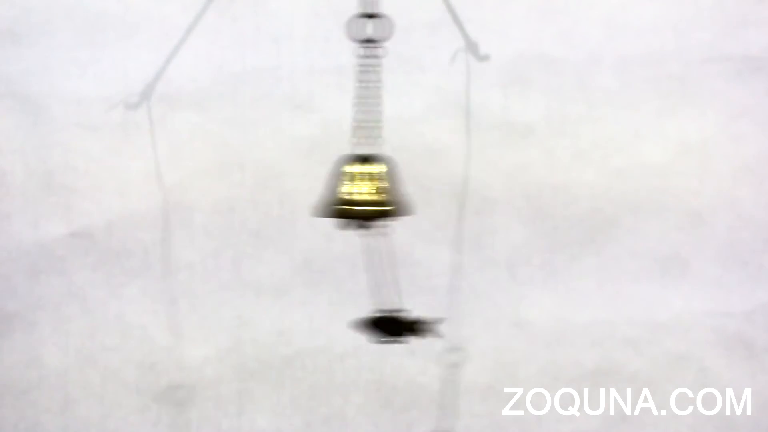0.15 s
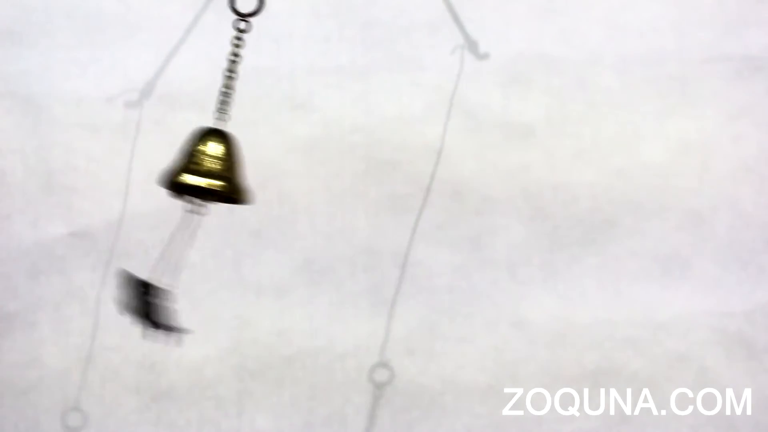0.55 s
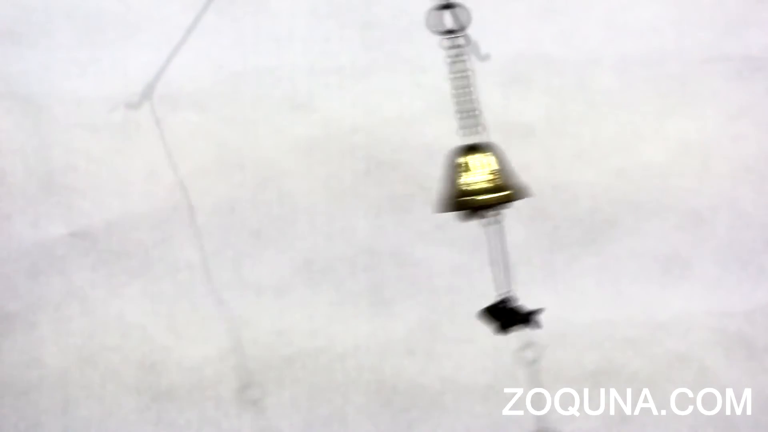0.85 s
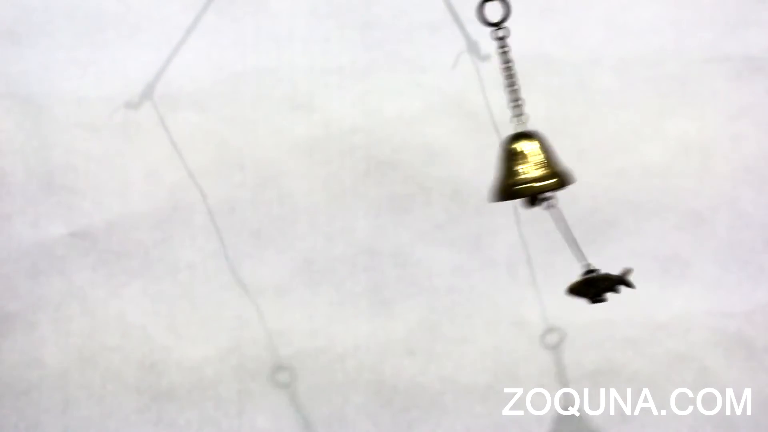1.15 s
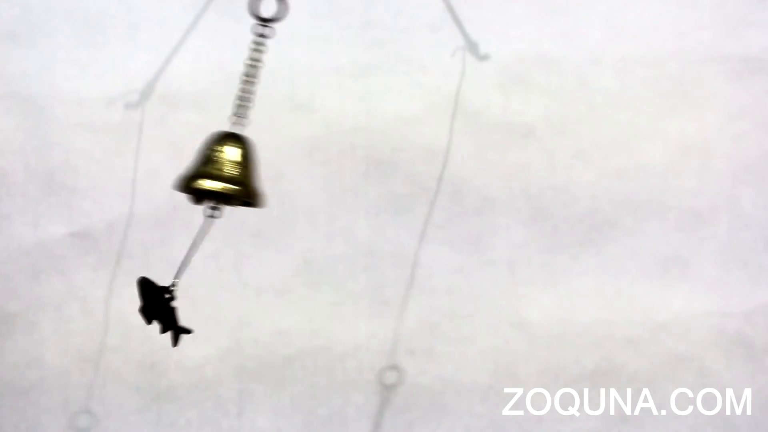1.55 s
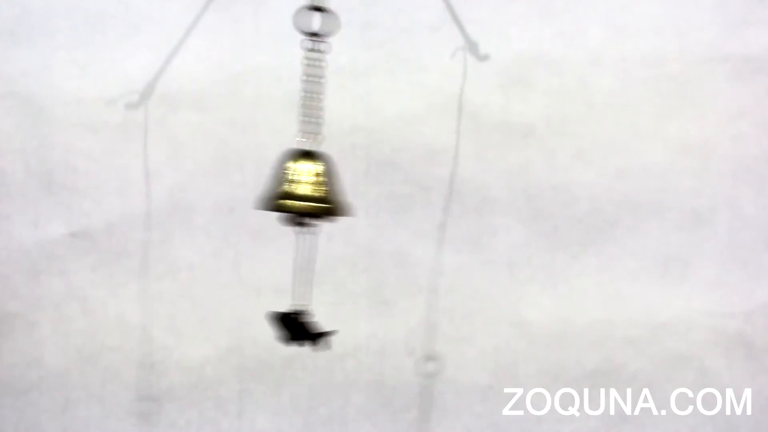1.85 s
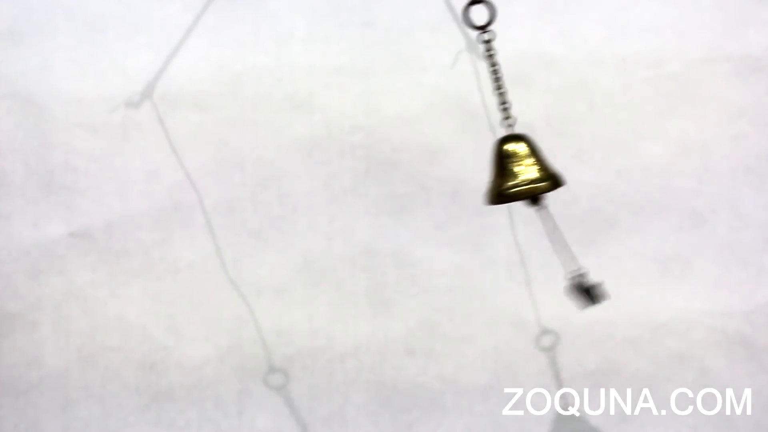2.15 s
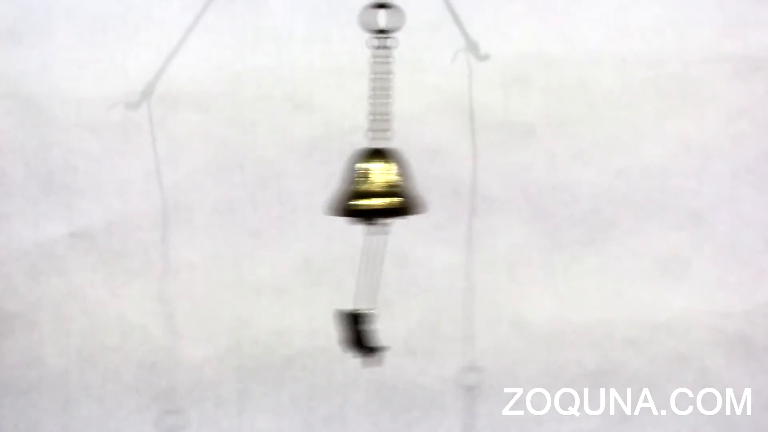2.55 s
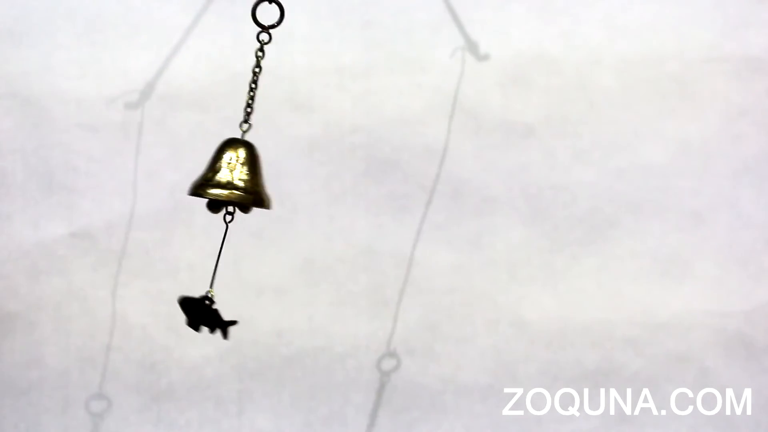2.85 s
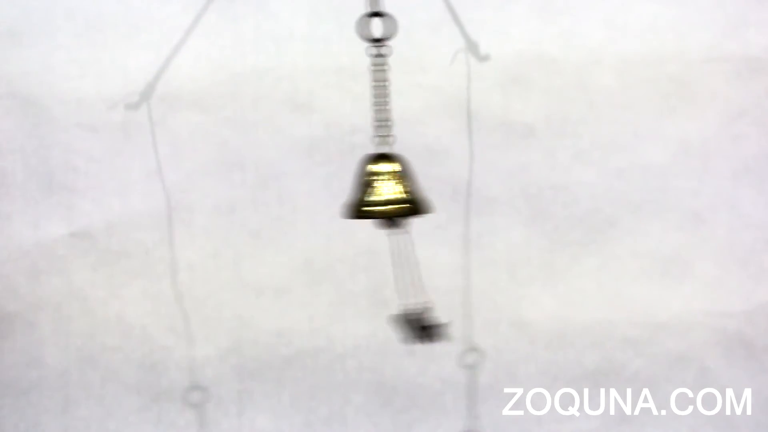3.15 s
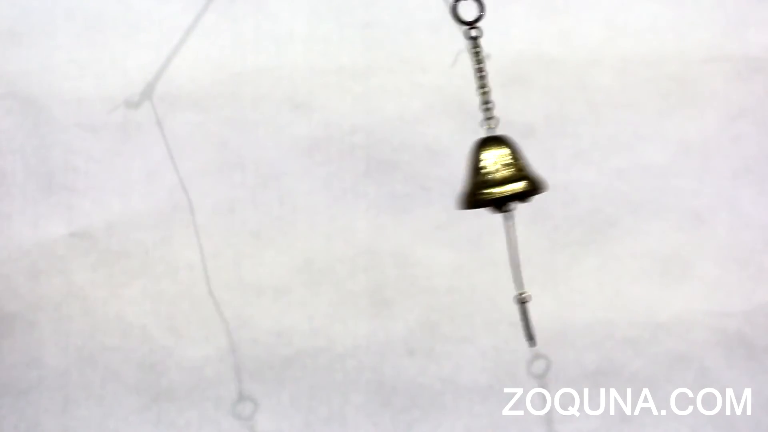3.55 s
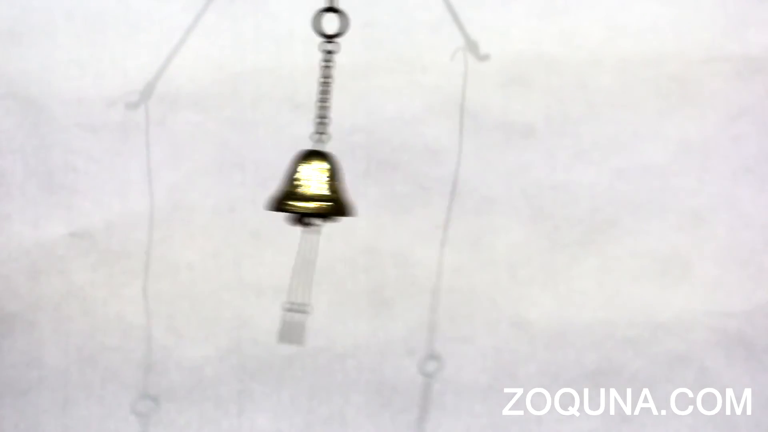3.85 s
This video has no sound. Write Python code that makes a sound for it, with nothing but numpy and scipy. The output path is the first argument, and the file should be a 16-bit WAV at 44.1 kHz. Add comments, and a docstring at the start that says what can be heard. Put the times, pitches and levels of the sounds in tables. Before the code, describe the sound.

Small hanging brass bell swings and tinkles with a clear, fluttering high ring in a quiet room.

```python
"""A small brass wind bell swings on its chain; its clapper strikes five times, hard at first, then lightly.
The bell's main tone and its overtone are close pairs of decaying modes that beat, swelling and fading
as the bell moves; each strike adds a burst of noise and a few short-lived modes.
Behind it: filtered-noise room hiss, a low hum of sines, soft noise scuffs and one faint narrow-band squeak."""
import sys
import numpy as np
from scipy.fft import rfft, irfft, next_fast_len
from scipy.io import wavfile
from scipy.ndimage import map_coordinates

SR = 44100
rng = np.random.default_rng(int(sys.argv[2]) if len(sys.argv) > 2 else 0)


def master_out(mix):
    """Clip the mix to full scale and print it as 16-bit PCM to the path in sys.argv[1]."""
    frames = np.transpose(np.atleast_2d(mix))
    ceiling = np.clip(frames, -1, 1)
    pcm = np.round(ceiling * 32767).astype(np.int16)
    wavfile.write(sys.argv[1], SR, pcm)


N = 176400

# Clapper strikes, mode levels before any swell: (time [s], lower prime mode [dB], upper prime mode [dB],
# lower overtone [dB], upper overtone [dB], click [dB], short-lived modes [dB])
STRIKES = [(-.012, -25.5, -26.5, -44, -52.5, -62, -55), (.7533, -22.5, -33.5, -31, -37, -32, -29),
           (1.2484, -29, -39.5, -54.5, -44.5, -37, -60), (2.272, -57.5, -37, -80, -62, -47.5, -69),
           (3.287, -43.5, -49, -76, -64.5, -51, -69)]


def amp(db):
    """Decibels to gain."""
    return 10 ** (np.asarray(db) / 20)


def unit(x):
    """Scale to rms 1."""
    return x / np.sqrt(np.mean(abs(x) ** 2) + 1e-20)


def clock():
    """Time of every sample [s]."""
    return np.arange(N) / SR


def along(points, hz):
    """Read a curve of (frequency [Hz], value) points on a log frequency axis."""
    f, v = np.transpose(points)
    return np.interp(np.log(hz + 1), np.log(f + 1), v)


def wobble(rate):
    """A smooth random curve with this many knots a second."""
    return map_coordinates(rng.standard_normal(256), [clock() * rate], mode="wrap")


def filtered(x, response):
    """Shape the spectrum of x with a gain that depends on frequency."""
    m = next_fast_len(N + SR // 2)  # spare length keeps the filter from wrapping round
    gain = response(np.fft.rfftfreq(m, 1 / SR))
    return irfft(rfft(x, m) * gain, m)[..., :N]


def noise(spectrum):
    """Stereo noise of rms 1 in the given colour; the mid-side balance sets how alike the ears are."""
    # Likeness of the two ears: (frequency [Hz], left-right correlation [-1 to 1])
    likeness = [(40, 0.78), (90, 0.68), (200, 0.38), (400, -0.22), (700, -0.19), (1400, -0.4), (3000, 0.09),
                (12000, -0.28)]

    def mid_side_gain(hz):
        turn = np.arccos(np.clip(along(likeness, hz), -1, 1)) / 2
        return amp(along(spectrum, hz)) * [np.cos(turn), np.sin(turn)]

    mid, side = filtered(rng.standard_normal((2, N)), mid_side_gain)
    return unit(np.array([mid + side, mid - side]))


def room(waver_rad=0.58):
    """Steady hiss of coloured noise, and a low hum of sines whose phases waver."""
    # Colour of the hiss: (frequency [Hz], relative level [dB])
    hiss_colour = [(20, -16), (32, -15.5), (42, 4), (70, -2.5), (100, 0), (200, -1.5), (350, -3.5),
                   (550, -7.5), (1300, -10.5), (3200, -13), (5500, -20), (9000, -21), (12000, -25.5),
                   (15500, -28)]
    # Hum tones: (frequency [Hz], level [dB])
    hum_tones = [(45, -67.5), (68, -63.5), (279.9, -66)]
    hiss_db = -53.5
    hum = np.zeros(N)
    for hz, db in hum_tones:
        phase = 2 * np.pi * hz * clock() + waver_rad * wobble(5.3)
        hum += amp(db) * np.sqrt(2) * np.sin(phase)
    return amp(hiss_db) * noise(hiss_colour) + hum


def scuffs(rough_db=0.5):
    """Soft rubbing noises that swell and die away, some with a dull thud of lower noise."""
    # Scuffs: (peak time [s], rise [s], 20 dB fall [s], scrape level [dB], thud level [dB])
    strokes = [(.22, .05, 0.16, -61.5, -74.5), (1.709, 0.0072, .06, -53, -90),
               (1.96, .045, 0.29, -44, -59.5), (2.07, 0.044, 0.14, -50, -69),
               (2.587, .022, 0.12, -41, -43.5), (2.7, .04, 0.24, -61, -60), (2.93, .055, 0.35, -52.5, -52),
               (3.713, .012, 0.078, -46, -85)]
    # Colours of the scrape and of the thud: (frequency [Hz], relative level [dB])
    scrape_colour = [(150, -9), (400, -5.5), (700, -6), (1400, -2.5), (2400, -2), (3400, 4.5), (4100, -1.5),
                     (5000, -15), (9000, -20.5), (15000, -37)]
    thud_colour = [(60, -20.5), (130, -3.5), (280, -3), (350, -5), (385, -6.5), (415, 12.5), (450, -5),
                   (520, -19), (900, -31), (3000, -70.5)]
    t = clock()
    scrape_power, thud_power = np.zeros(N), np.zeros(N)
    for s, rise, fall, scrape_db, thud_db in strokes:
        swelling = np.exp(-((t - s) / rise) ** 2)
        dying = amp(-20 * abs(t - s) / fall)
        shape = np.where(t < s, swelling, dying)
        scrape_power += (amp(scrape_db) * shape) ** 2
        thud_power += (amp(thud_db) * shape) ** 2
    scrape = np.sqrt(scrape_power) * amp(rough_db * wobble(60)) * noise(scrape_colour)
    return scrape + np.sqrt(thud_power) * noise(thud_colour)


def squeak():
    """A thin, fluttering squeak of narrow-band noise leads into the loudest scuff."""
    start_s, end_s, edge_s = 2.284, 2.62, 0.025
    centre_hz, width_hz = 3240, 32
    level_db, flutter_db = -51.5, 3.5
    t = clock()
    gate = np.clip(np.minimum(t - start_s, end_s - t) / edge_s, 0, 1)
    tone = filtered(rng.standard_normal((2, N)), lambda hz: 1 / (1 + ((hz - centre_hz) / width_hz) ** 2))
    return amp(level_db) * gate * unit(tone * amp(flutter_db * wobble(45)))


def swing_phase(hz):
    """The bell's place on its arc, in radians of a sound wave of this pitch."""
    period_s, reach_m, turn_s = 1.21, .06, 1.05  # turn_s: a moment at one end of the arc
    place_m = reach_m * np.cos(2 * np.pi * (clock() - turn_s) / period_s)
    return 2 * np.pi * hz * place_m / 343  # speed of sound [m/s]


def doppler(hz, toward=0.15):
    """Pitch rises and falls a little with the share of the swing that goes to and from the listener."""
    return np.exp(1j * toward * swing_phase(hz))


def swung(hz, echo, count=8):
    """Gain at each ear of a tone whose wall echoes shift in phase as the bell swings."""
    shift = swing_phase(hz)
    echoes = np.zeros((2, N), complex)
    for ear in range(2):
        for way in np.linspace(-1, 1, count):  # path lengthens or shortens with the swing
            echoes[ear] += np.exp(1j * (way * shift + 2 * np.pi * rng.random()))
    return unit(1 + echo * echoes / np.sqrt(count))


def ring(hz, levels_db, fall_db_per_s):
    """One mode as a complex tone: each strike sets its level anew, then it dies away."""
    contact_s = .005  # crossfade from the old ringing to the new
    t, tone = clock(), np.zeros(N, complex)
    for strike, db in zip(STRIKES, levels_db):
        age = np.maximum(t - strike[0], 0)
        taken = np.clip(age / contact_s, 0, 1)
        fresh = amp(db - fall_db_per_s * age) * np.exp(1j * (rng.random() - .5))
        tone = (1 - taken) * tone + taken * fresh
    return np.sqrt(2) * tone * np.exp(2j * np.pi * hz * t)


def clapper():
    """Metal meets metal: a click of decaying noise and a few short-lived modes."""
    # Short-lived modes of bell and clapper: (frequency [Hz], relative level [dB], 60 dB decay [s])
    brief_modes = [(1668, -27, 0.19), (4500, -29.5, .05), (9505, -28, .1), (10350, -3, 0.056),
                   (11040, -22.5, 0.076), (14735, -29.5, .2), (14783, -24, .2), (15506, -34.5, .3),
                   (15552, -31.5, .3)]
    # Colour of the click: (frequency [Hz], relative level [dB])
    click_colour = [(300, -34.5), (1200, -8.5), (2600, 1.5), (4200, 8), (5500, -11), (9000, 1.5),
                    (12000, -19.5), (15500, -27)]
    click_t60_s = 0.057
    out, click = np.zeros((2, N)), noise(click_colour)
    for s, *_, click_db, modes_db in STRIKES:
        age = clock() - s
        on = (age > 0) & (age < .5)
        u = age[on]
        modes = 0
        for hz, level, t60 in brief_modes:
            phase = 2 * np.pi * hz * u + rng.uniform(0, 2.2, (2, 1))  # each ear starts at its own phase
            modes = modes + amp(level - 60 * u / t60) * np.sin(phase)
        out[:, on] += amp(modes_db) * modes
        out[:, on] += amp(click_db - 60 * u / click_t60_s) * click[:, on]
    return out


def hum_note():
    """The bell's faint lowest mode, a sine that only the first strike wakes and that is soon gone."""
    hz, peak_db, t60_s = 1593, -53.5, 0.24
    t = clock()
    return amp(peak_db - 60 * t / t60_s) * np.sin(2 * np.pi * hz * t)


def overtone():
    """The bright upper pair of modes beats, dies sooner than the prime and flutters with the swing."""
    # Lower and upper mode of the pair: (frequency [Hz], frequency [Hz])
    pair_hz = (9025, 9057)
    # Swell and fade of the pair: (time [s], level [dB])
    pair_swell = [(0, -2), (.2, 2), (.36, -5), (.72, -6), (.78, 1), (.92, -5), (.99, 1), (1.12, 1),
                  (1.29, 1), (1.42, -3), (1.58, 1), (1.72, -9), (2.28, -3), (2.55, 5), (2.7, -3), (3.31, 0),
                  (3.42, -8)]
    fall_db_per_s = 54
    echo = 1.1  # wall echoes over the direct sound
    pair = np.zeros((2, N))
    for hz, levels in zip(pair_hz, np.transpose(STRIKES)[3:5]):
        pair += (ring(hz, levels, fall_db_per_s) * swung(hz, echo) * doppler(hz)).real
    return pair * amp(np.interp(clock(), *np.transpose(pair_swell)))


def prime():
    """The main tone: two modes that beat about thirty times a second, least steadily where they fade."""
    # Lower and upper mode of the pair: (frequency [Hz], frequency [Hz])
    pair_hz = (3967, 3997)
    # Swell and fade of each mode as the bell swings: (time [s], left level [dB], right level [dB])
    lower_swell = [(0.0, -3, -13), (0.1, 3, 2), (0.14, 3, 5), (0.22, -6, -11), (0.34, 4, 4), (0.42, -2, -2),
                   (0.58, 2, -3), (0.62, 0, -12), (0.68, -5, 4), (0.72, 3, 8), (0.78, -3, -6),
                   (0.8, -11, -4), (0.84, 1, 4), (0.88, 0, 1), (0.92, -12, -3), (0.96, 1, 0),
                   (1.04, -3, -11), (1.1, -16, -2), (1.14, -14, 0), (1.22, 0, -12), (1.3, 0, 2),
                   (1.34, -8, -6), (1.42, 1, 6), (1.46, -6, 1), (1.5, -10, -11), (1.56, -10, -2),
                   (1.72, -8, -19), (1.8, -11, -1), (1.88, 2, 3), (2.1, -7, -7), (2.16, 4, 5), (2.24, 0, 0),
                   (2.94, 6, 8), (3.36, -4, -7), (3.5, -1, 3), (3.99, -5, -12)]
    upper_swell = [(0.0, -3, 1), (0.2, -1, -5), (0.24, 3, 5), (0.34, -3, -4), (0.4, 1, 2), (0.48, 2, 6),
                   (0.58, 0, 3), (0.72, -11, -12), (0.78, 1, 2), (1.0, 0, 2), (1.06, -12, -13),
                   (1.1, -1, -3), (1.52, 0, 2), (1.58, -17, -8), (1.72, -8, 2), (1.96, 0, 4),
                   (2.3, -9, -17), (2.34, 0, -1), (2.44, 2, 5), (2.52, -9, 2), (2.56, -1, -6),
                   (2.64, -8, -12), (2.7, -1, 2), (2.92, -14, 3), (3.26, -12, -2), (3.32, -2, -11),
                   (3.42, -8, 3), (3.99, 1, -4)]
    fall_db_per_s = 17
    wander_rad, wander_growth = .55, .7  # phase wander at a swell of 0 dB; how it grows as the gain drops
    out = np.zeros((2, N))
    for hz, levels, swell in zip(pair_hz, np.transpose(STRIKES)[1:3], (lower_swell, upper_swell)):
        s, *ears = np.transpose(swell)
        gain = amp([np.interp(clock(), s, db) for db in ears])
        drift = wander_rad * np.array([wobble(14), wobble(10)]) / gain ** wander_growth
        tone = ring(hz, levels, fall_db_per_s) * gain
        out += (tone * np.exp(1j * drift) * doppler(hz)).real
    return out


def scene():
    """The bell in its quiet room."""
    background = room() + scuffs() + squeak()
    bell = clapper() + hum_note() + overtone() + prime()
    return background + bell


def record(dry):
    """Nothing is kept above the band limit."""
    top_hz = 15750
    return filtered(dry, lambda hz: hz < top_hz)


dry = scene()
out = record(dry)
master_out(out)
```